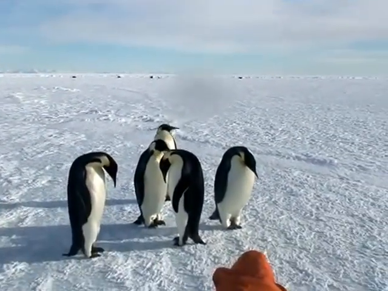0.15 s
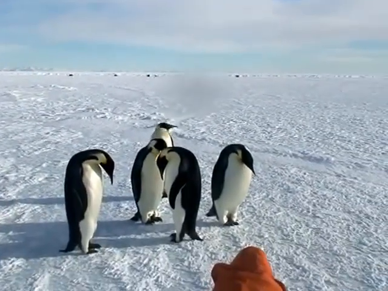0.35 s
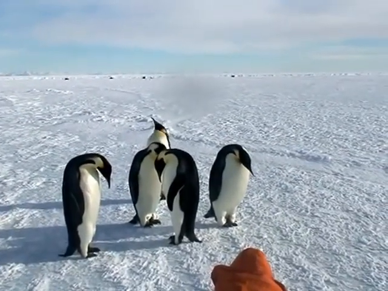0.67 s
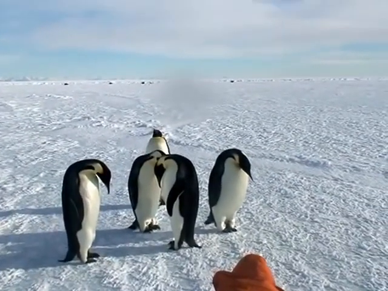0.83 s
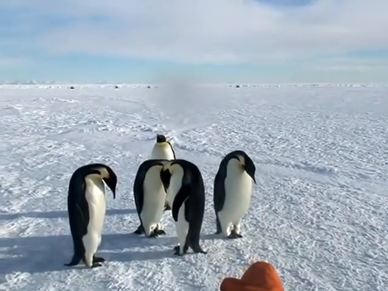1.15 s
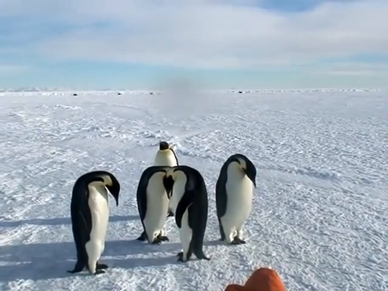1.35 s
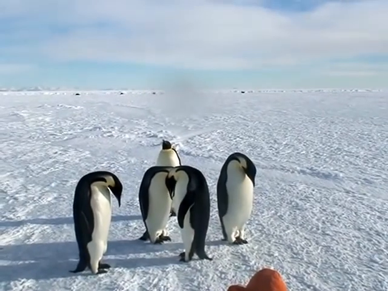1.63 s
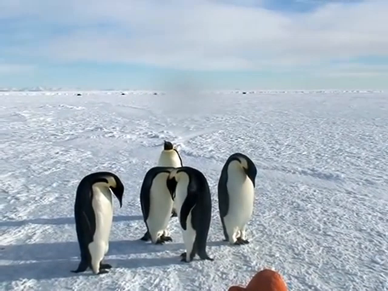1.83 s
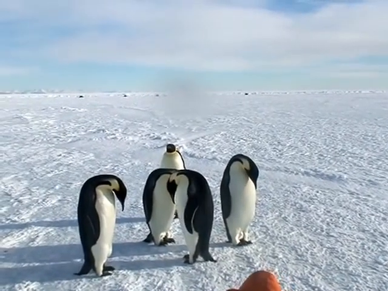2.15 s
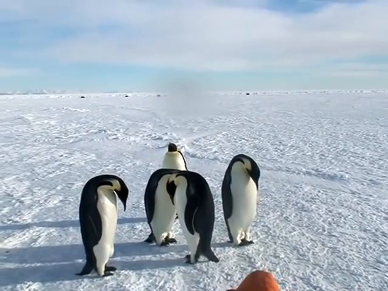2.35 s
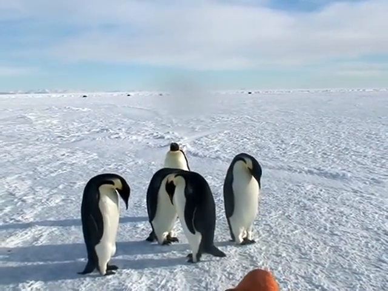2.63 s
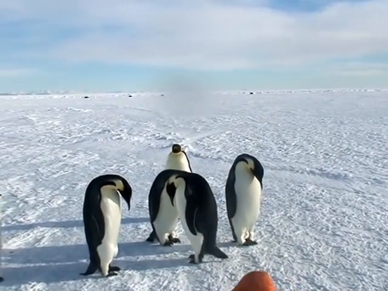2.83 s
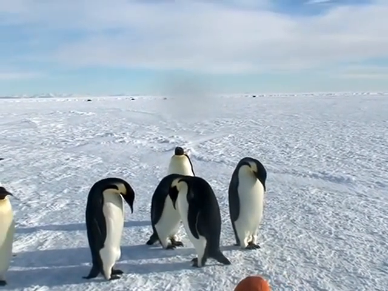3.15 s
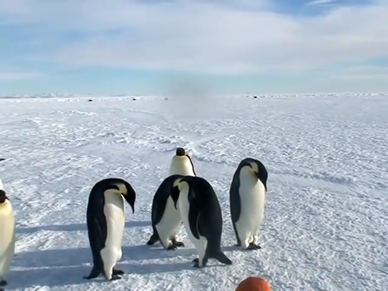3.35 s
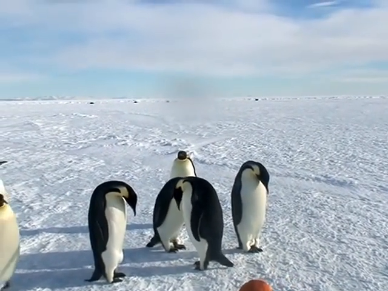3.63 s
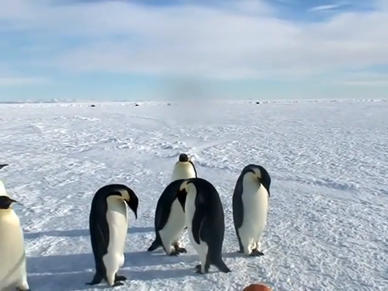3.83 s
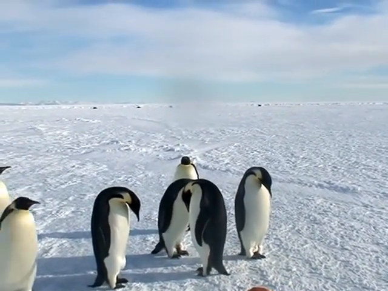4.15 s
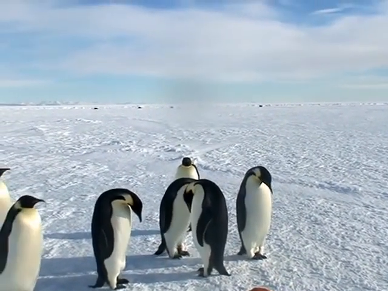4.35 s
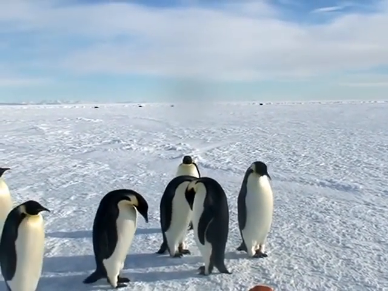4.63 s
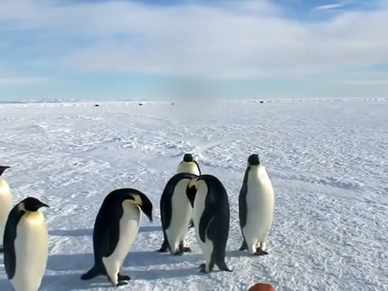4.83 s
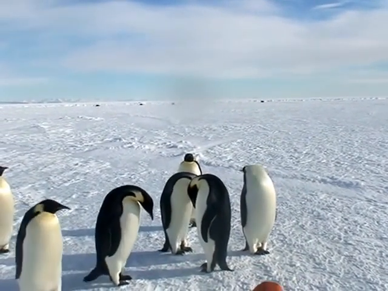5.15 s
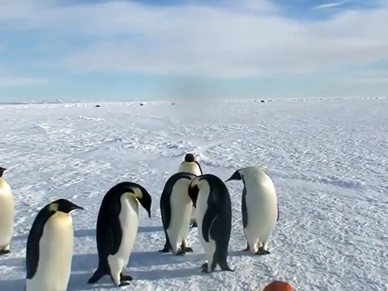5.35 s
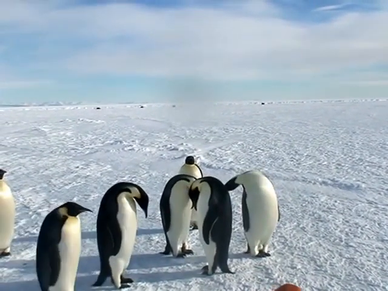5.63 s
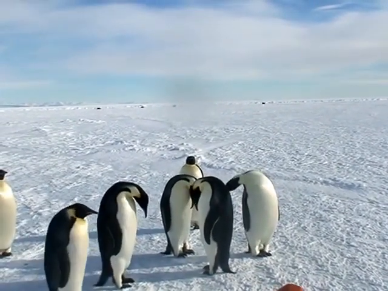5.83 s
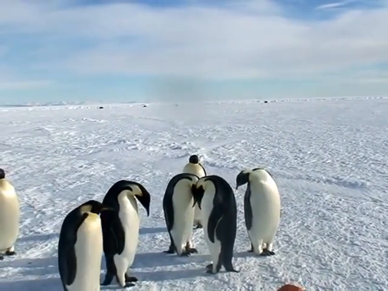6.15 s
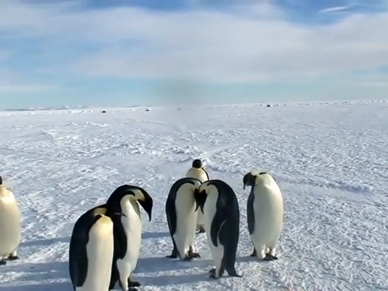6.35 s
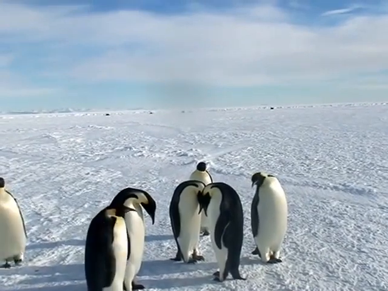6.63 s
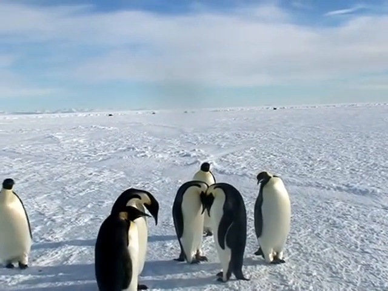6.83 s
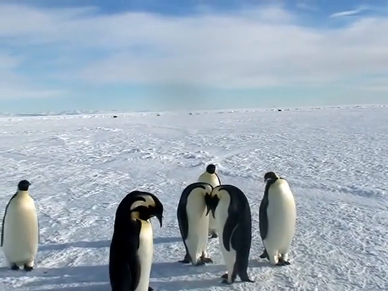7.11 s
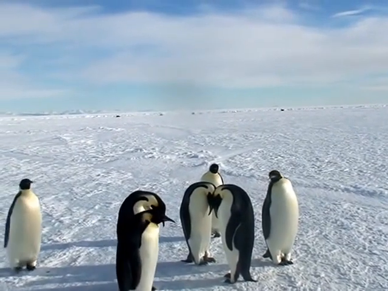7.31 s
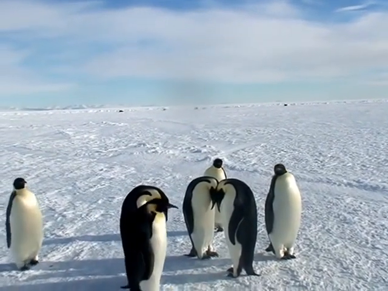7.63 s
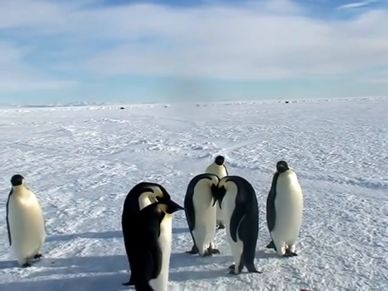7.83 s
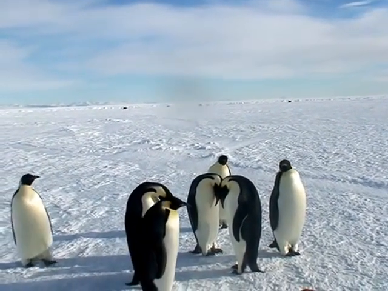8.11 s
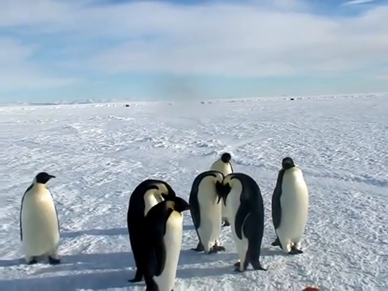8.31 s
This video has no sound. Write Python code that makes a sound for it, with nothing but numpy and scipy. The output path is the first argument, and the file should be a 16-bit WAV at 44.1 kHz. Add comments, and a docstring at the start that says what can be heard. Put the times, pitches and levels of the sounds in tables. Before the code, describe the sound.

After crisp snow ticks and scuffs, a penguin brays a harsh warbling phrase, repeats it over a duller neighbour, and a third answers and finishes alone.

```python
"""Emperor penguins trumpeting on sea ice

One bird sings a phrase, then sings again over a duller neighbour; a third replies and ends alone.
Each bird sounds two pulse trains, one for each side of the syrinx; their beats make the buzzing warble.
Noise bursts make the snow crust tick, crackle and scuff under shuffling feet, over faint air and a low hum."""
import sys
import numpy as np
from scipy import signal
from scipy.fft import rfft, irfft, next_fast_len
from scipy.io import wavfile
from scipy.ndimage import uniform_filter1d, map_coordinates

SR = 44100
rng = np.random.default_rng(int(sys.argv[2]) if len(sys.argv) > 2 else 0)


def file_out(sig):
    """Save sig as 16-bit WAV at sys.argv[1]."""
    # one column per channel
    cols = np.atleast_2d(sig).T
    # limit, then scale
    lim = np.clip(cols, -1, 1)
    pcm = np.round(lim * 32767).astype(np.int16)
    wavfile.write(sys.argv[1], SR, pcm)


N = 373527
TIME_S = np.arange(N) / SR
LEFT_RIGHT = np.array([[1], [-1]])

# Song tables, one row a syllable: start/s, end/s, lower voice/Hz, upper voice/Hz, glide/share of pitch,
# upper-voice flick/share of pitch, level before call gain/dB, roughness/0-1
# Throat tables, resonances of throat and bill: f/Hz, level/dB


def undb(db):
    """Decibels to gain."""
    return 10 ** (np.asarray(db) / 20)


def unit(x):
    """Scale to rms 1."""
    return x / np.sqrt(np.mean(x ** 2))


def wander(rate_hz, count):
    """Smooth chance of spread about 1: random knots, rate_hz a second, joined by a cubic spline."""
    knots = rng.standard_normal(count // 8)
    position = np.arange(count) * min(rate_hz / SR, .12)
    return 1.1 * map_coordinates(knots, [position], order=3, mode="wrap")


def response(points, size=4096):
    """Minimum-phase impulse response of a (f/Hz, level/dB) spectrum, by folding its cepstrum."""
    hz, db = np.transpose(points)
    bins_hz = np.maximum(np.fft.rfftfreq(size, 1 / SR), 1)
    level_db = np.interp(np.log(bins_hz), np.log(hz), db)
    cepstrum = irfft(np.log(undb(level_db)))
    cepstrum[1:size // 2] *= 2
    cepstrum[size // 2 + 1:] = 0
    return irfft(np.exp(rfft(cepstrum)))


def colour(x, points):
    """Pass a sound through a spectrum."""
    return signal.oaconvolve(x, response(points))[:len(x)]


def first_call():
    """The opening phrase: faint creaky syllables, then loud warbling ones, the last sliding down and fading."""
    song = [(1.124, 1.16, 357, 420, -0.0034, .02, -27.5, 0.73),
            (1.183, 1.2, 360, 420, -0.0042, 0.017, -28, 0.54),
            (1.22, 1.275, 355, 415, -0.013, 0.028, -16.5, 0.86),
            (1.309, 1.416, 360, 417, -0.016, 0.057, -13.5, 0.43),
            (1.453, 1.612, 367, 421.5, -0.014, 0.1, -11, .32),
            (1.647, 1.812, 366, 425, 0.0087, 0.084, -14, 0.24),
            (1.851, 2.003, 370, 429.7, .01, .09, -13, 0.13),
            (2.043, 2.398, 369, 430.4, 0.037, .11, -13, 0.05),
            (2.443, 2.64, 391, 470, -0.064, 0.061, -13.5, .18)]
    throat = [(230, -14), (350, -16.5), (440, -3), (580, -1.5), (750, 6.5), (880, 8.5), (990, 1), (1130, 4),
              (1400, -5), (1880, -0.5), (2050, -9), (2550, -4), (3000, -10), (3950, -6), (4400, -15),
              (4800, -11.5), (5700, -18.5), (7500, -25.5), (9000, -37.5), (12500, -29.5), (15500, -44)]
    voice = call(song, throat, swell_db_per_octave=41, low_db=1.5, pull_rad=0.32, throb=0.019, sum_db=-36)
    return undb(-0.62) * voice


def second_call():
    """The first bird sings again, its throat reshaped and its beats throbbing more."""
    song = [(3.722, 3.8, 362, 418.7, -0.004, .02, -37.5, 0.73),
            (3.845, 3.903, 358, 406.7, 0, 0.024, -18.5, 0.69),
            (3.936, 4.04, 366, 415, 0.016, 0.045, -16.5, 0.29),
            (4.09, 4.275, 372, 424.3, 0.015, 0.058, -13.5, 0.23),
            (4.325, 4.5, 382, 435.9, 0.014, 0.052, -12, 0.23),
            (4.545, 5.005, 370.9, 420.7, .155, 0.064, -11.5, 0.0803),
            (5.052, 5.195, 425, 479.9, -.06, .13, -13, 0.1493),
            (5.235, 5.322, 372, 425, -0.0092, 0.055, -16.5, 0.53),
            (5.351, 5.505, 370, 420.7, .01, 0.057, -12, 0.25),
            (5.54, 5.742, 372, 420.2, -0.002, 0.049, -13.5, 0.25),
            (5.775, 6.04, 370, 420.5, 0.032, .06, -13.5, 0.1582),
            (6.08, 6.21, 385, 435, -0.0068, .05, -21, .25)]
    throat = [(230, -32), (420, -8.5), (580, -7.5), (760, 4.5), (860, 0.5), (990, 4.5), (1140, 5),
              (1400, -10), (1900, 0), (2150, -5), (2800, -17.5), (3750, -10), (4500, -14), (5700, -18),
              (7500, -24), (9000, -31.5), (12500, -32), (15500, -53)]
    voice = call(song, throat, swell_db_per_octave=-3, low_db=3, pull_rad=0.14, throb=0.2, sum_db=-18)
    return undb(-0.44) * voice


def neighbour_call():
    """A neighbour with a duller throat sings under the second call."""
    song = [(4.015, 4.247, 394, 468, 0.011, 0.029, -17.5, .2),
            (4.276, 4.425, 396, 468, 0.028, 0.033, -15.5, 0.22),
            (4.465, 4.6, 396, 470, 0.011, 0.029, -16.5, 0.19), (4.63, 5.195, 397, 478, .02, .04, -19, 0.13),
            (5.225, 5.335, 385, 455, 0, 0.0299, -17.5, .4),
            (5.36, 5.56, 380, 445, -0.026, 0.0304, -19, 0.41)]
    throat = [(230, -21), (400, -2.5), (480, -2), (620, -5), (800, -1), (950, 6), (1170, 4), (1420, 3.5),
              (1750, -6.5), (2500, -12.5), (3600, -10.5), (5500, -23), (8000, -33), (12500, -39),
              (15500, -44)]
    voice = call(song, throat, swell_db_per_octave=-4, low_db=-0.5, pull_rad=0.32, throb=0.033, sum_db=-30)
    return undb(-1.5) * voice


def reply_call():
    """A third bird replies with wide glides and ends alone."""
    song = [(5.57, 5.742, 375, 428, .02, 0.0291, -18, 0.44),
            (5.782, 6.165, 378, 436, .13, 0.039, -18.5, .2), (6.2, 6.296, 452, 514, 0, .13, -13.5, .08),
            (6.339, 6.398, 434.8, 492.7, -0.053, 0.072, -15.5, 0.17),
            (6.434, 6.555, 400, 452, -0.039, .1, -15.8, 0.208),
            (6.586, 6.877, 378, 430, .13, 0.041, -17.5, 0.058),
            (6.918, 7.135, 434, 493, -0.27, .1, -16, 0.053)]
    throat = [(230, -16.5), (370, -17), (540, 2.5), (660, 7), (900, 1.5), (1130, -2.5), (1480, 3),
              (1900, 0), (2200, -11.5), (2500, -2.5), (2900, -12), (3500, -5.5), (4500, -8.5),
              (5500, -11.5), (7000, -20), (9000, -25.5), (12000, -24), (15500, -39)]
    voice = call(song, throat, swell_db_per_octave=28, low_db=-2, pull_rad=0.21, throb=0.011, sum_db=-18.5)
    return undb(-0.37) * voice


def call(song, throat, swell_db_per_octave, low_db, pull_rad, throb, sum_db, margin_s=.02):
    """One call: the double voice through the throat, its level following the glide."""
    inside = (TIME_S > song[0][0] - margin_s) & (TIME_S < song[-1][1] + margin_s)
    t = TIME_S[inside]
    low_hz, high_hz, pressure, rough, octaves = articulate(t, song)
    source = syrinx(low_hz, high_hz, rough, low_db, pull_rad, throb, sum_db)
    voice = colour(source, throat)
    # a harsh voice rings the bill more shrilly
    shrill = signal.lfilter(*signal.iirpeak(5700, 2.5, fs=SR), voice)
    voice += np.clip(rough, 0, .5) * shrill
    voice /= np.sqrt(uniform_filter1d(voice ** 2, size=2200))  # level to running rms 1 over 50 ms
    swell = undb(swell_db_per_octave * octaves)
    out = np.zeros(N)
    out[inside] = voice * pressure * swell * signal.windows.tukey(len(t), .01)
    return out


def articulate(t, song):
    """Each syllable bursts open, overshoots in pitch, warbles, glides and sags shut: voice controls."""
    attack_s, release_s, gap_db = .0062, .0048, -18.5  # the air valve leaks a little when shut
    flick_at_s, flick_s = .028, .02
    warble_depth, warble_period_s, warble_decay_s = .04, .086, .1
    quaver_depth, quaver_db, quaver_hz = .06, 3.5, 35  # depth and swing at full roughness
    sag_depth, sag_s, glide_power = .12, .011, 2.05
    onset_rough, settle_s = 0.435, 0.0452

    rows = np.array(song)
    current = np.searchsorted((rows[1:, 0] + rows[:-1, 1]) / 2, t)  # switch rows mid-gap
    start, end, low_hz, high_hz, glide, flick, level_db, grit = rows[current].T
    length = end - start
    age, left = np.clip(t - start, 0, length), np.clip(end - t, 0, length)

    drift = 1 + glide * (age / length) ** glide_power  # gathers pace toward the end
    swing = np.cos(2 * np.pi * (age - flick_at_s) / warble_period_s)
    warble = warble_depth * swing * np.exp(-age / warble_decay_s)
    unsteady = grit * wander(quaver_hz, len(t))
    sag = sag_depth * (np.exp(-age / sag_s) + np.exp(-left / sag_s))
    bend = drift * (1 + warble + quaver_depth * unsteady - sag)
    overshoot = 1 + flick * np.exp(-((age - flick_at_s) / flick_s) ** 2)

    opening = (1 + np.tanh((t - start) / attack_s)) * (1 - np.tanh((t - end) / release_s)) / 4
    slack = 1 - opening  # the membranes flutter loosely between syllables
    smooth_db = uniform_filter1d(level_db + quaver_db * unsteady, size=400)
    pressure = (opening + undb(gap_db) * slack) * undb(smooth_db)
    # each syllable starts harsh and clears
    rough = opening * (grit + onset_rough * np.exp(-age / settle_s)) + slack
    return low_hz * bend, high_hz * bend * overshoot, pressure, rough, np.log2(drift)


def syrinx(low_hz, high_hz, rough, low_db, pull_rad, throb, sum_db, jitter=.028, rasp_rad=.036, shimmer_db=2.6):
    """Two membranes in one airstream: each beat between them tugs their timing and swells their pulses."""
    count = len(rough)

    def turn(hz):
        """Phase of one membrane, its pitch jittering with roughness."""
        return 2 * np.pi * np.cumsum(hz * (1 + jitter * rough * wander(200, count))) / SR

    low, high = turn(low_hz), turn(high_hz)
    beat = high - low
    tug = pull_rad * np.sin(beat)
    # closures land a little early or late: low harmonics stay clean, high ones rasp
    low_side = pulses(low + tug + rasp_rad * wander(500, count))
    high_side = pulses(high - tug + rasp_rad * wander(500, count))
    flow = (undb(low_db) * low_side + high_side) * (1 + throb * np.cos(beat))
    flow += undb(sum_db) * np.cos(low + high)  # each throttles the other's air: a sum tone
    turbulence = colour(rng.standard_normal(count), [(500, -14), (2000, -7), (6000, 0), (12000, 5)])
    flow += (.18 + .8 * rough) * turbulence * (1 + .4 * np.cos(low))
    shimmer = np.clip(rough + 0.11, 0, 1) * wander(70, count)
    return flow * undb(shimmer_db * shimmer)


def pulses(phase, count=34):
    """One sharp pulse a turn: the closed-form sum of count equal harmonics, at rms 1."""
    half = phase % (2 * np.pi) / 2 + 1e-9  # offset avoids 0/0
    harmonics = np.sin((2 * count + 1) * half) / (2 * np.sin(half)) - .5
    return harmonics / np.sqrt(count / 2)


def steps(grain_db=8.0):
    """Feet press the snow: a dull thud, a crunch and a dry hiss, each of sparse grains of uneven size."""
    # Shuffling steps: centre/s, half length/s, thud/dB, crunch/dB, dry hiss/dB
    presses = [(0.002, 0.04, -38, -48, -49), (0.236, 0.28, -45.5, -54, -73), (0.316, 0.0055, -37, -48, -70),
               (0.755, 0.015, -48, -36.5, -45), (0.904, 0.023, -35, -38, -43),
               (0.958, 0.007, -28.5, -32, -49), (1.022, 0.046, -33, -35.5, -56),
               (1.213, 0.075, -34.5, -33, -67), (2.643, 0.076, -49.5, -51, -47),
               (2.778, 0.0071, -41.5, -41.5, -40), (2.975, 0.0066, -64, -44, -38.5),
               (2.95, 0.16, -76, -53.5, -48.5), (3.49, 0.081, -59, -59, -56), (4.0, 0.14, -36, -55, -67),
               (5.3, 0.084, -32.5, -52, -60), (5.948, 0.1, -32.5, -50, -60),
               (6.311, 0.058, -33.5, -56, -67), (6.788, 0.28, -35.5, -56, -61),
               (7.181, 0.043, -47, -45, -47.5), (7.278, 0.052, -36.5, -53, -54),
               (7.575, 0.0047, -31, -63, -60), (7.603, 0.0032, -33, -59, -60),
               (7.577, 0.089, -46.5, -49, -45.5), (7.796, 0.043, -41.5, -64, -73),
               (7.899, 0.0039, -46, -41.5, -49), (8.148, 0.0096, -52, -42, -41),
               (8.214, 0.016, -63, -46, -39)]
    # Spectra of the three layers: f/Hz, level/dB
    thud = [(40, -20), (130, -3.5), (330, 1.5), (600, -0.5), (1000, -10.5), (2000, -51), (6000, -49)]
    crunch = [(200, -49), (800, 0), (1500, 1), (3300, -9.5), (6000, -22), (14000, -27)]
    hiss = [(600, -53), (2500, 0), (5500, 2), (9000, -7), (12500, -4.5), (15500, -14)]
    out = 0
    for column, spectrum, top_db in ((2, thud, 10), (3, crunch, 19), (4, hiss, 16)):
        power = 0
        for row in presses:
            bell = np.exp(-np.minimum(((TIME_S - row[0]) / row[1]) ** 2, 20))
            power = power + undb(row[column]) ** 2 * bell
        sizes = undb(np.minimum(grain_db * rng.exponential(size=N), top_db))
        grains = rng.standard_normal(N) * sizes * (rng.random(N) < .15)
        out = out + np.sqrt(power) * unit(colour(grains, spectrum))
    return out


def ticks(ring_s=0.0012, ring=0.16, size=600):
    """Each tick is a single click and a tiny crumble of decaying noise."""
    # Sharp ticks of the snow crust, and at 1.186 s one from the bird's creaky start: t/s, peak/dB
    snaps = [(0.276, -21.5), (0.35, -22.5), (0.4193, -13.5), (0.5257, -16.5), (0.574, -15.5),
             (0.595, -18.5), (0.6285, -26), (0.6958, -18), (0.7371, -17), (0.8105, -17.5), (0.85, -17.5),
             (0.89, -30), (0.994, -26), (1.038, -23), (1.186, -18), (2.864, -34), (3.1272, -25),
             (3.164, -26), (7.992, -32), (8.092, -25.5), (8.15, -39), (8.284, -30)]
    # Tick spectrum: f/Hz, level/dB
    tick_colour = [(200, -40), (900, 4), (1700, 11), (3200, 13.5), (4700, -1), (7000, -10), (15000, -22)]
    after_s, after_db = .008, -16
    after_snaps = [(s + after_s, db + after_db) for s, db in snaps]  # a smaller snap follows each
    out = np.zeros(N + size)
    for s, db in [*snaps, *after_snaps, *crackle()]:
        snap = ring * rng.standard_normal(size) * np.exp(-np.arange(size) / SR / ring_s)
        snap[0] += 1
        snap = colour(snap, tick_colour)
        start = int(s * SR)
        out[start:start + size] += undb(db) * snap / abs(snap).max()
    return out[:N]


def crackle(spread_db=4):
    """Faint ticks at chance moments as the crust takes weight: rows of (t/s, peak/dB)."""
    # Spells of crackle: start/s, end/s, rate/(ticks/s), mean peak/dB
    spells = [(0.249, 1.095, 18, -26), (2.695, 3.207, 10, -44), (7.149, 8.293, 20, -31.5)]
    rows = []
    for start, end, rate, db in spells:
        for when, force in rng.random((int(rate * (end - start)), 2)):
            rows.append((start + when * (end - start), db + spread_db * (2 * force - 1)))
    return rows


def ice(x, scatter_db=-11, scatter_s=.004, far_db=-31, far_s=.03, wide=.35, size=8192):
    """The rough crust scatters a little treble straight back; open ice gives almost no tail."""
    t = np.arange(size) / SR
    tails = 0
    for db, decay_s in ((scatter_db, scatter_s), (far_db, far_s)):
        tail = np.exp(-t / decay_s) * rng.standard_normal((2, size))
        tails = tails + undb(db) * unit(tail) / np.sqrt(size)
    bright = colour(x, [(400, -7), (1200, -2), (3000, 5)])
    mid, side = (signal.oaconvolve(bright, tail)[:N] for tail in tails)
    return x + mid + wide * side * LEFT_RIGHT


def air(air_db=-49, side_db=-13):
    """Faint moving air: coloured noise of unsteady level, mostly central."""
    # Air spectrum: f/Hz, level/dB
    air_colour = [(20, -22), (50, -14), (100, -12), (170, -5), (300, -13), (560, -15), (770, -12),
                  (950, -15.5), (2700, -22), (6000, -26.5), (10500, -31), (12100, -27.5), (15500, -40)]
    mid, side = (unit(colour(rng.standard_normal(N), air_colour)) for _ in range(2))
    return undb(air_db + wander(12, N)) * (mid + undb(side_db) * side * LEFT_RIGHT)


def hum(hum_hz=103, hum_db=-55):
    """A low sine wavering in pitch and level."""
    phase = 2 * np.pi * np.cumsum(hum_hz * (1 + 0.07 * wander(43, N))) / SR
    return np.sin(phase) * undb(hum_db + 5 * wander(14, N))


def wind(wind_db=-63, gust_db=3):
    """A little wind on each microphone port: separate low noises with shared gusts."""
    # Wind spectrum: f/Hz, level/dB
    wind_colour = [(25, -11), (60, -11), (150, -15), (500, -18), (2000, -31)]
    noise = [unit(colour(rng.standard_normal(N), wind_colour)) for _ in range(2)]
    return np.array(noise) * undb(wind_db + gust_db * wander(3.2, N))


def scene():
    """Three birds and shuffling feet on the ice, with air, hum, wind and ticks."""
    birds = first_call() + second_call() + neighbour_call() + reply_call()
    return ice(birds + steps()) + air() + hum() + wind() + ticks()


def record(dry):
    """Two microphone ports slightly out of phase; loud peaks are rounded and the top is cut."""
    # Phase by which the left port leads: f/Hz, phase/rad
    port_phase = [(0, -0.31), (1100, -0.16), (3500, -0.15), (6000, -0.22), (16000, -0.21)]
    top_hz = 15600
    size = next_fast_len(N)
    lead_rad = np.interp(np.fft.rfftfreq(size, 1 / SR), *np.transpose(port_phase))
    shift = np.exp(1j * np.array([lead_rad, -lead_rad]) / 2)
    ports = irfft(rfft(dry, size) * shift, size)[:, :N]
    rounded = .9 * np.tanh(ports / .9)
    return signal.sosfilt(signal.ellip(8, .2, 70, top_hz, fs=SR, output="sos"), rounded)


dry = scene()
out = record(dry)
file_out(out)
```